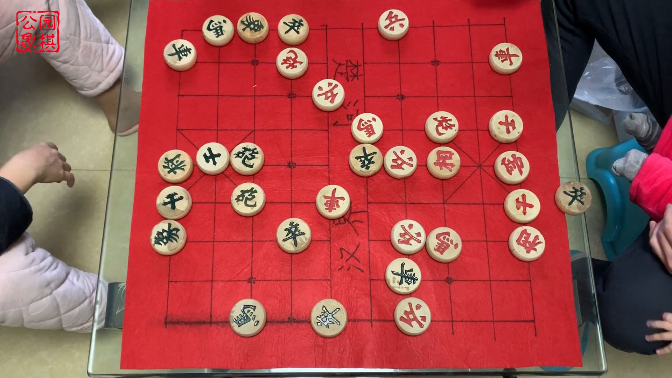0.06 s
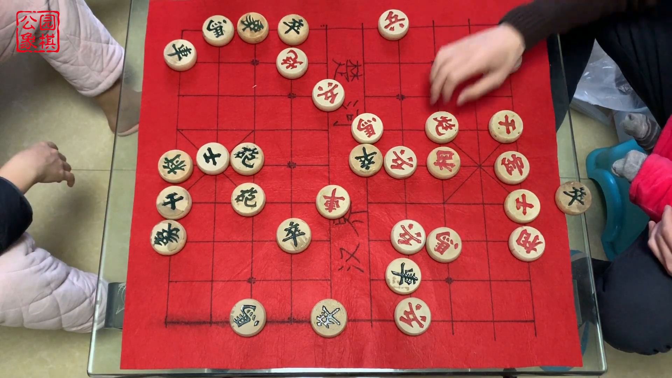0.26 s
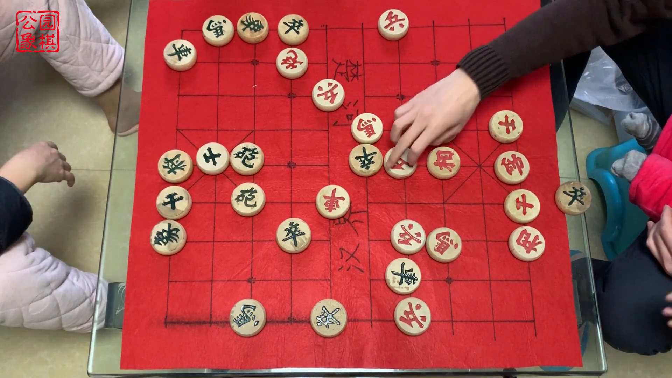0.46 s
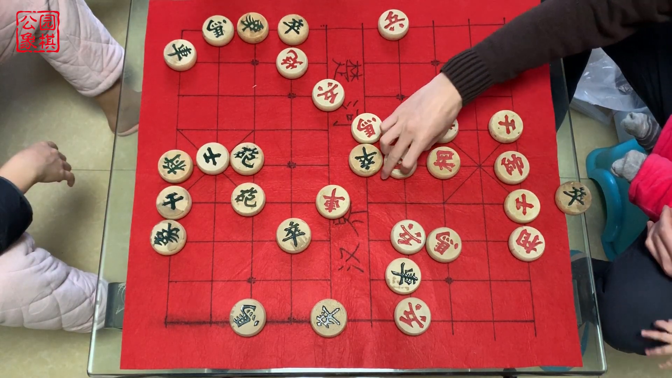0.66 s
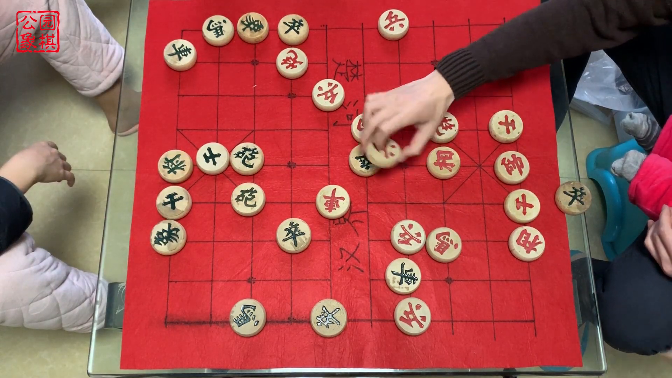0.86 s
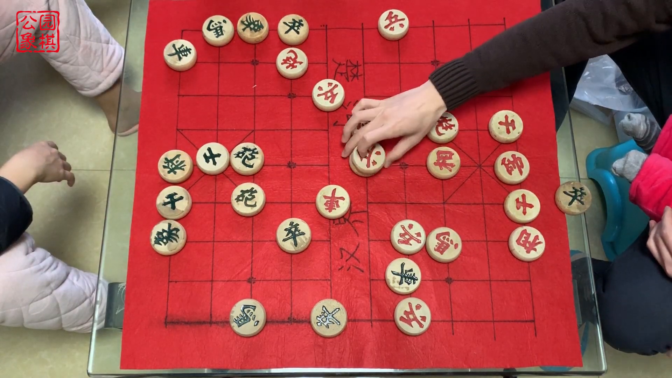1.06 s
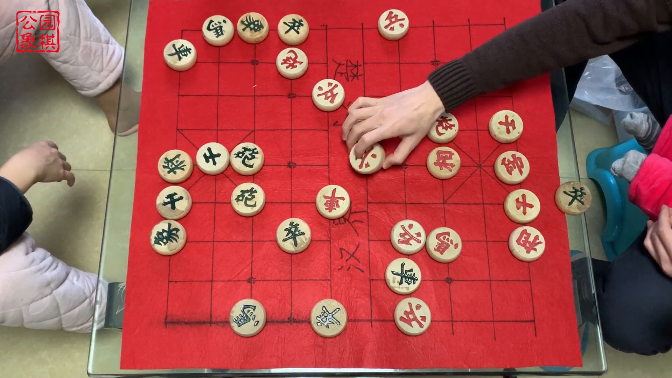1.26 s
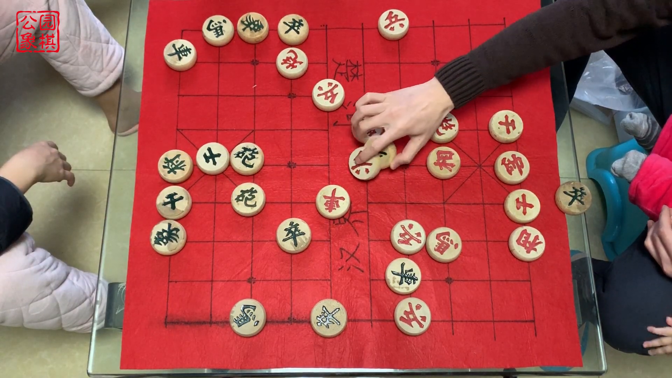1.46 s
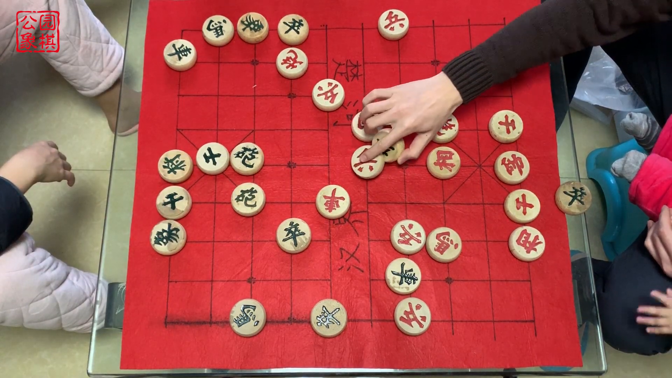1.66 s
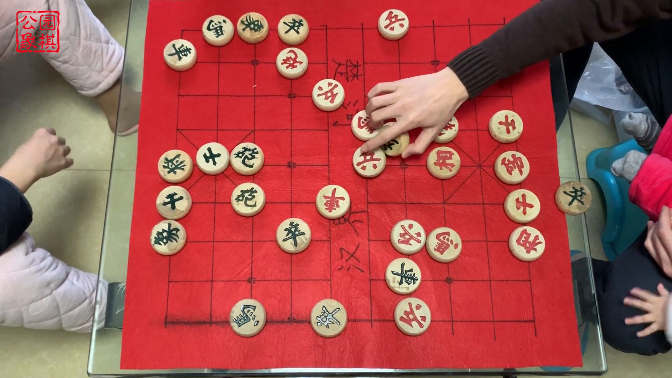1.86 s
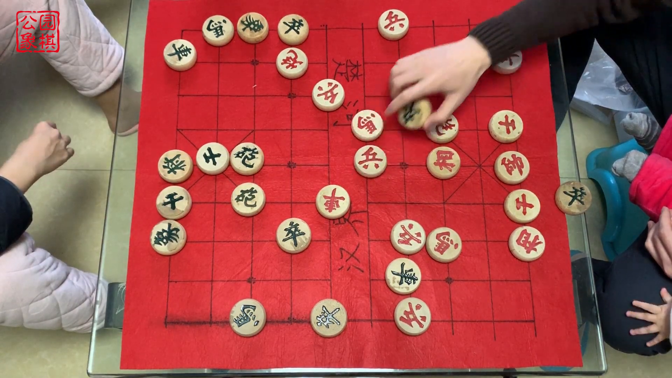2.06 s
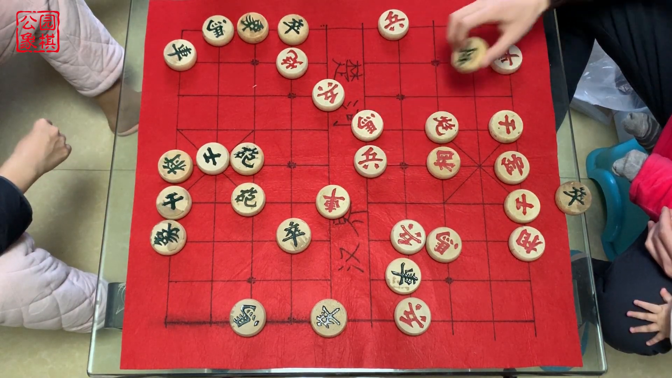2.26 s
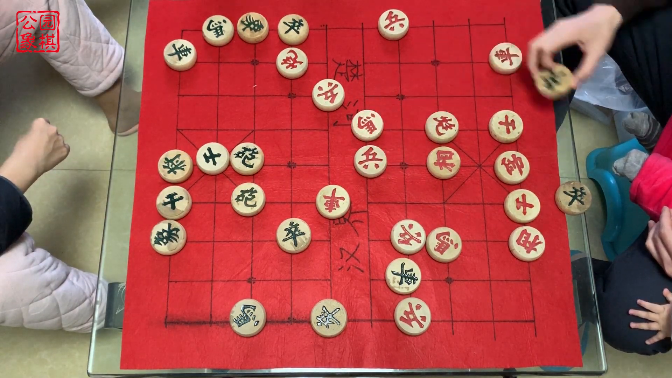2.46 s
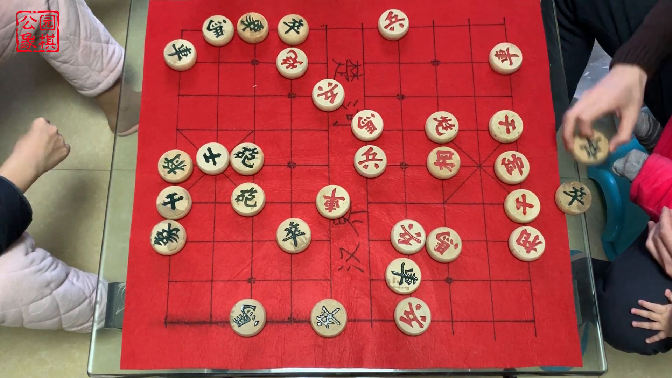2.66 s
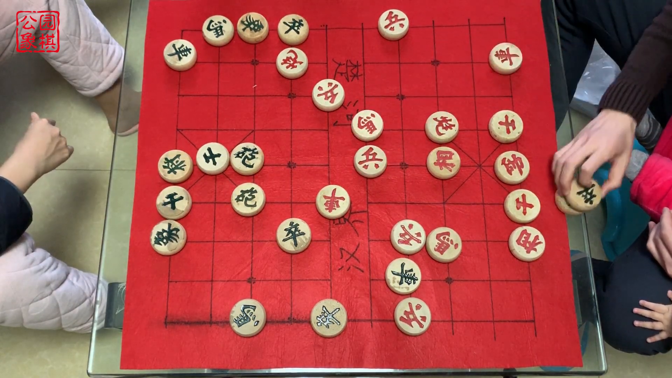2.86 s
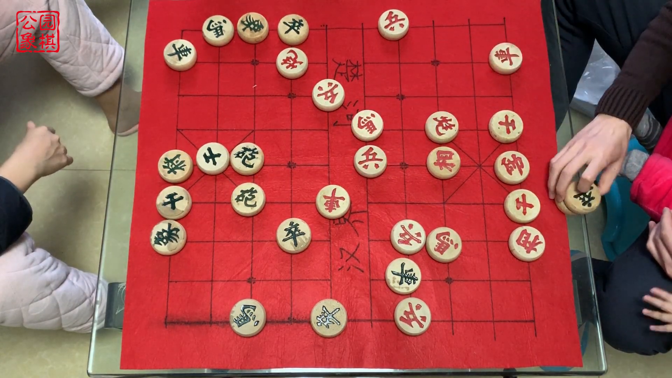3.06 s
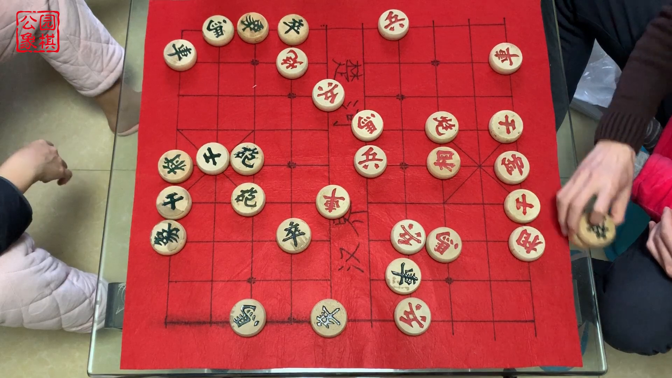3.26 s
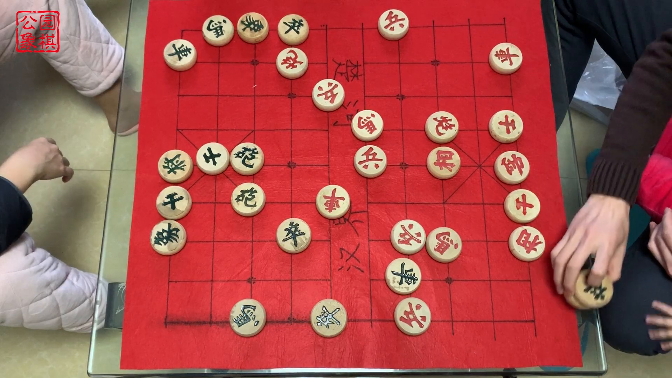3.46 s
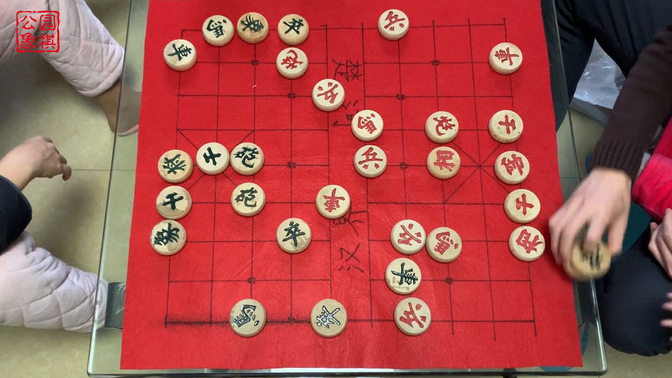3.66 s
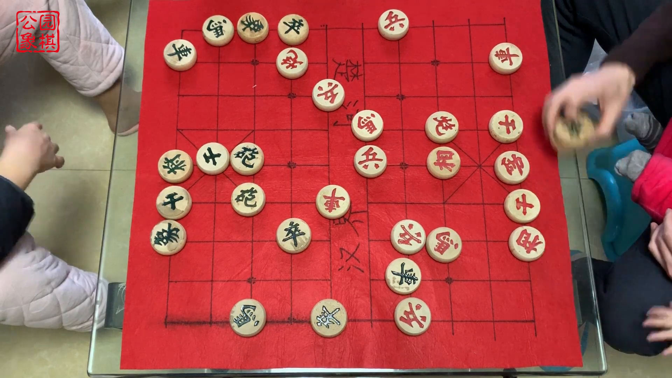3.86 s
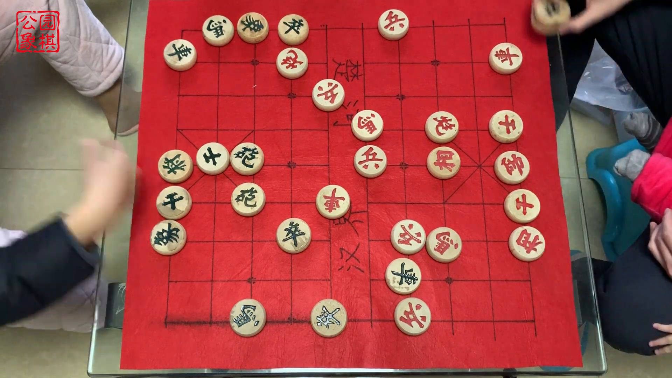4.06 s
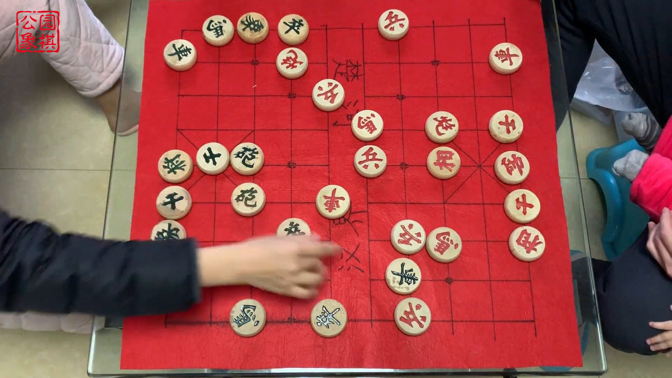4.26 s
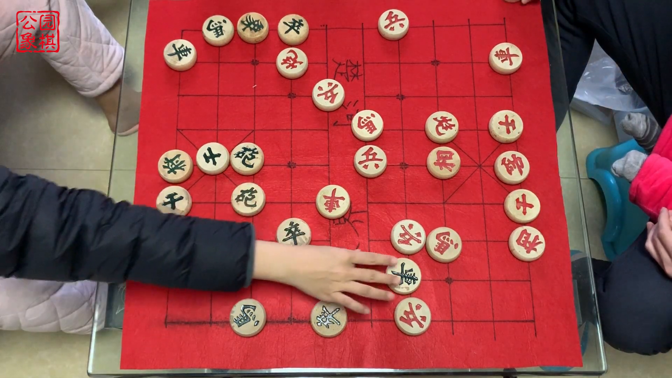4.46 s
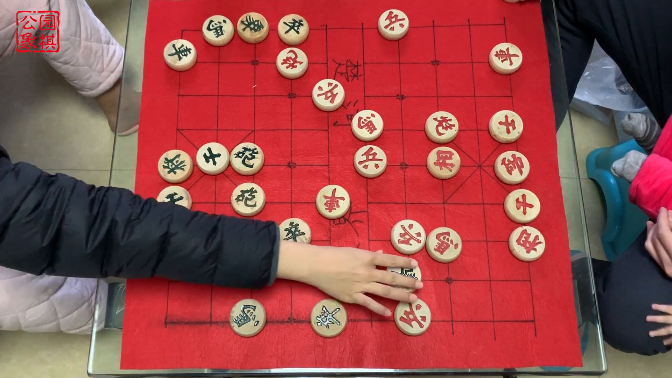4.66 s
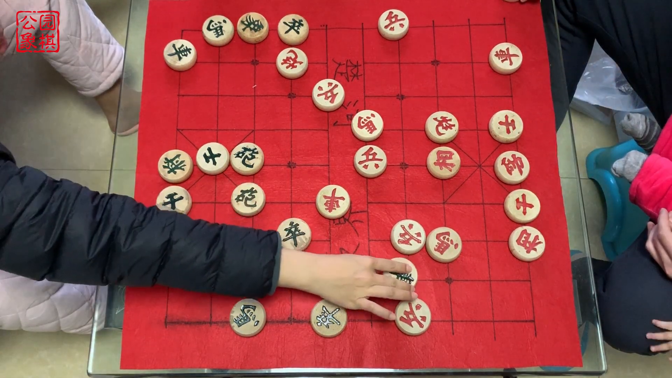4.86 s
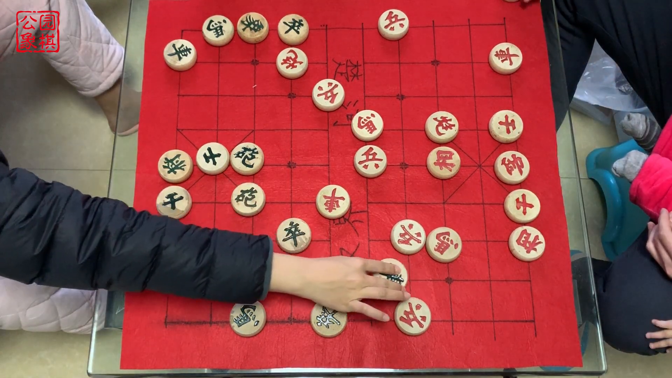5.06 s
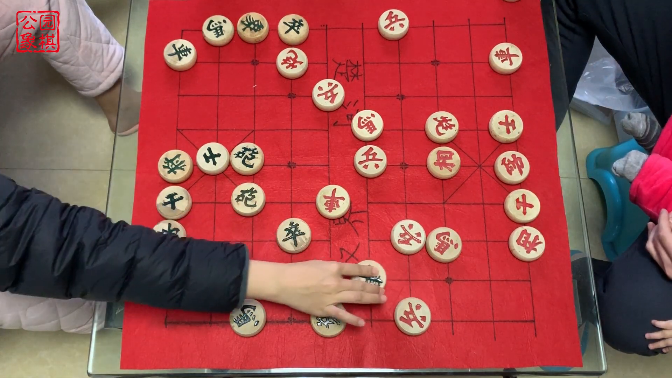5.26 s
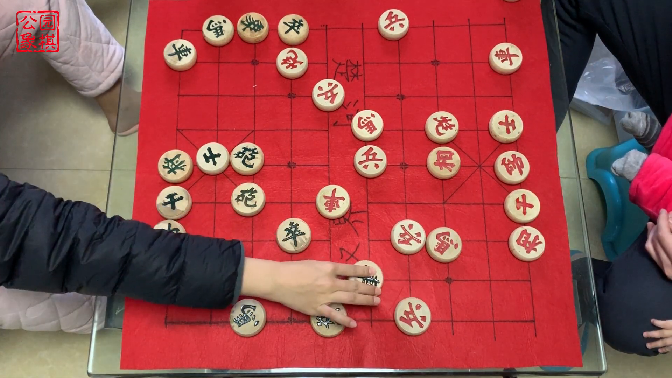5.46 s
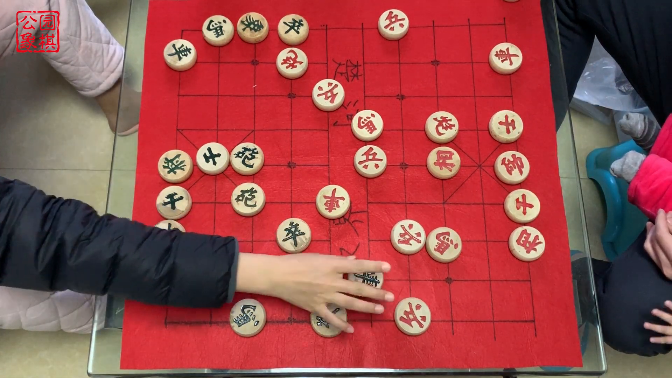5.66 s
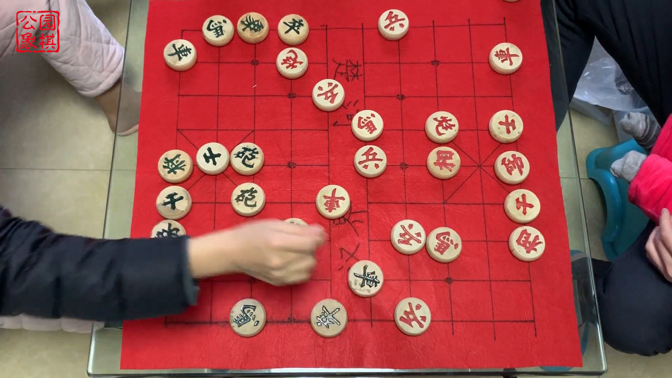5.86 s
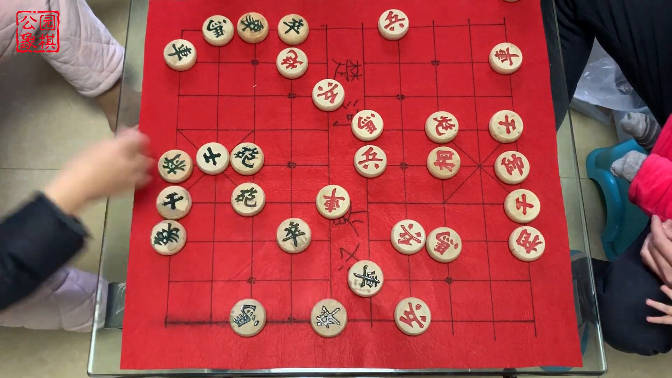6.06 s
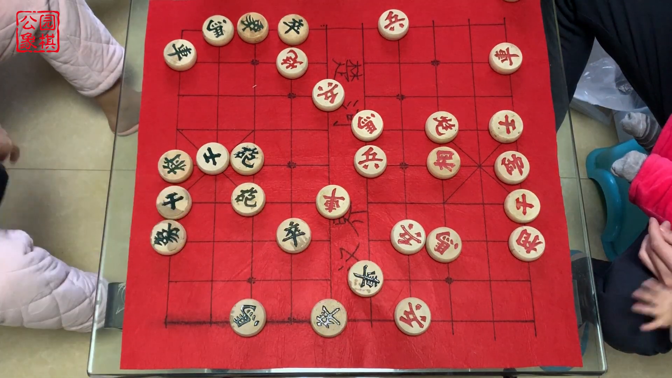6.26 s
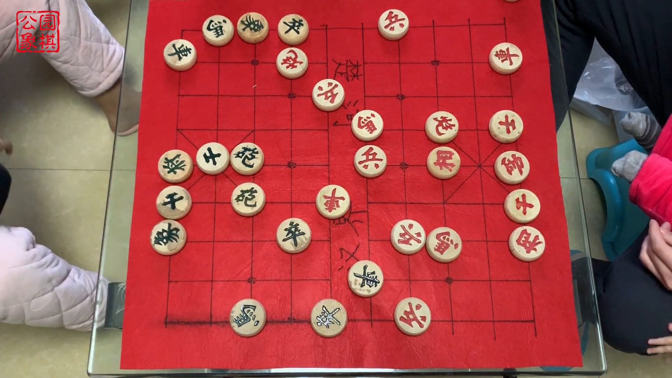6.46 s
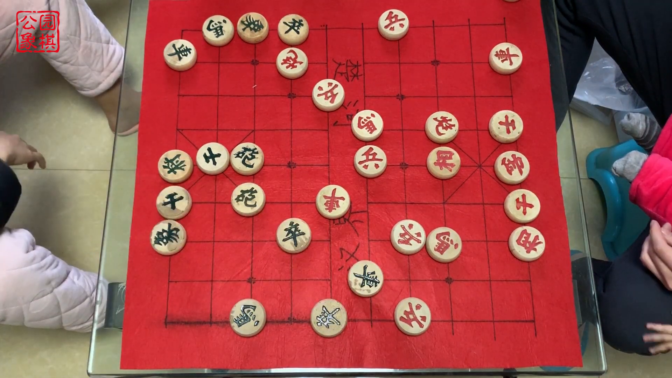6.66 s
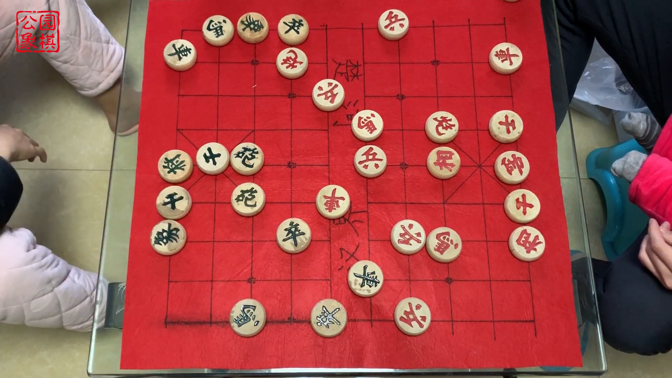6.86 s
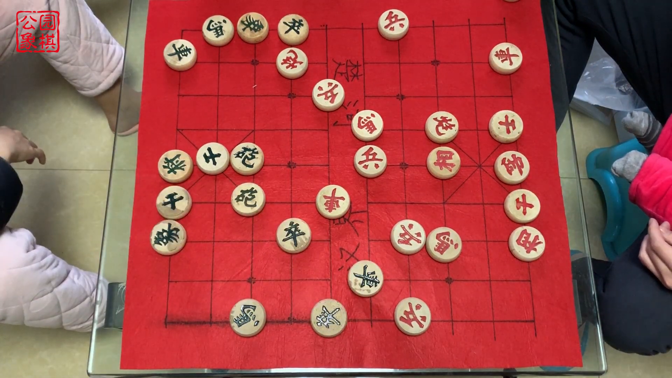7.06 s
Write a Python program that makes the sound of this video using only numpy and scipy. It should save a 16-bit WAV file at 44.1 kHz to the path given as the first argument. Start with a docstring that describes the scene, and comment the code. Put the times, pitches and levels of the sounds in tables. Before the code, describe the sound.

A wooden disc slaps loudly onto another on a felt-covered glass table, then a double clack on the rim and a sharp reply, over faint hum.

```python
"""A steady hum and the rustle of sleeves are heard first, then wooden chess pieces on a felt board over glass.
One piece is slapped onto another, the captured one is dropped on the bare glass rim, and a reply is slapped down.
A car horn toots once, far away; the listener is just above the table, between hard walls.
Hum and cloth are shaped noise, the horn is a sum of harmonics, and the table rings as a bank of decaying modes
with dense clatter; each wooden contact is a band-limited pulse with a few short modes of the piece."""
import sys
import numpy as np
from scipy import signal
from scipy.fft import rfft, irfft, next_fast_len
from scipy.io import wavfile
from scipy.ndimage import map_coordinates

SR = 44100
rng = np.random.default_rng(int(sys.argv[2]) if len(sys.argv) > 2 else 0)


def to_wav(sig):
    """Store sig (one row per channel, or 1-D mono) as 16-bit WAV at the path in sys.argv[1].

    Samples outside -1..1 are clipped; the rate is SR.
    """
    pcm = np.clip(np.atleast_2d(sig), -1, 1) * 32767
    pcm = np.round(pcm).astype(np.int16)
    wavfile.write(sys.argv[1], SR, pcm.T)  # frames by channels


N = 313754  # length of the scene in samples
T = np.arange(int(.7 * SR)) / SR  # time axis of one short event, s


def amp(db):
    """Level: decibels to amplitude gain."""
    return 10 ** (np.asarray(db) / 20)


def unit(x):
    """Normalisation: scale to rms 1."""
    return x / np.sqrt(np.mean(x ** 2) + 1e-20)


def along(points, hz):
    """Logarithmic pitch scale: read (Hz, value) points at any frequency."""
    f, value = np.transpose(points)
    return np.interp(np.log(hz + 1), np.log(f), value)


def wobble(rate):
    """Slow modulation: a smooth random curve with rate knots a second."""
    knots = rng.standard_normal(int(N * rate / SR) + 4)
    return map_coordinates(knots, [np.arange(N) * rate / SR])


def swell(rows, rest_db):
    """Power addition: bell-shaped swells (s, length s, dB) add in power to a resting gain."""
    t = np.arange(N) / SR
    power = amp(rest_db) ** 2
    for s, length, db in rows:
        bell = np.exp(-2 * ((t - s) / length) ** 2)
        power = power + (amp(db) * bell) ** 2
    return np.sqrt(power)


def filtered(x, response):
    """Linear filtering: multiply the spectrum by a response of frequency."""
    n = x.shape[-1]
    m = next_fast_len(n + 8192)
    return irfft(rfft(x, m) * response(np.fft.rfftfreq(m, 1 / SR)), m)[..., :n]


def band(x, low_hz, high_hz):
    """Band limiting: a causal third-order band-pass."""
    return signal.sosfilt(signal.butter(3, [low_hz, high_hz], "band", fs=SR, output="sos"), x)


def noise(size, spectrum, alike):
    """Interaural correlation: stereo noise with a given colour and left-right likeness."""
    def colours(hz):
        turn = np.arccos(np.clip(along(alike, hz), -1, 1)) / 2
        return amp(along(spectrum, hz)) * [np.cos(turn), np.sin(turn)]

    mid, side = filtered(rng.standard_normal((2, size)), colours)
    return np.array([mid + side, mid - side])


def dying(x, t60):
    """Frequency-dependent damping: each band decays by 60 dB in its own t60."""
    hz, t, z = signal.stft(x, SR, nperseg=256)
    decay = amp(-60 * t / along(t60, hz)[:, None])
    return signal.istft(z * decay, SR, nperseg=256)[1][:, :x.shape[1]]


def panned(x, left_right_db):
    """Level difference: share a left-right difference in dB between the two channels."""
    return x * amp([[left_right_db / 2], [-left_right_db / 2]])


def add(out, s, sound):
    """Superposition: mix a sound in at time s."""
    part = out[:, round(s * SR):][:, :sound.shape[1]]
    part += sound[:, :part.shape[1]]


# colour of the steady wash. Each row: frequency in Hz, relative level in dB per Hz
HUM_SPECTRUM = [(15, -15), (25, -8.5), (53, -3), (100, -10.5), (160, -9.5), (400, -14), (650, -14.5),
                (1000, -11), (1500, -21.5), (2400, -34.5), (5000, -48), (8000, -42.5), (12000, -44),
                (15500, -46)]
# stereo width of the wash and whir. Each row: frequency in Hz, left-right likeness (1 is identical)
HUM_ALIKE = [(60, 0.16), (180, 1), (550, 0.54), (1650, -0.038), (4970, -0.078), (15000, 0.5)]


def hum(level_db=-63.5):
    """Broadband noise: a steady coloured wash whose level drifts slightly."""
    return amp(level_db + 0.2 * wobble(3.6)) * unit(noise(N, HUM_SPECTRUM, HUM_ALIKE))


def whir(level_db=-70, centre_hz=990, width_hz=90):
    """Narrow-band noise: a fuzzy tone that fluctuates in level."""
    flat = noise(N, [(1000, 0)], HUM_ALIKE)
    tone = unit(band(flat, centre_hz - width_hz / 2, centre_hz + width_hz / 2))
    return amp(level_db + 2.6 * wobble(18)) * tone


# swells of the low rumble. Each row: time of the top in seconds, length in seconds, level in dB
RUMBLE_SWELLS = [(.54, 0.3, -58), (6.3, .9, -64.5)]


def rumble(rest_db=-71):
    """Low-frequency noise: a rumble alike in both channels swells above its resting level."""
    spectrum = [(12, -15), (27, 0), (60, -6), (150, -25), (600, -67.5), (2000, -120)]  # Hz, dB per Hz
    return swell(RUMBLE_SWELLS, rest_db) * unit(noise(N, spectrum, [(50, 1.0)]))


def horn(start_s=3.765, end_s=3.9, level_db=-63, low_hz=399, high_hz=491, flare_hz=1040, flare_width_hz=330):
    """Resonance: harmonics of two steady notes pass the flare's peak and are dulled by distance."""
    tone = 0
    for hz in np.outer([low_hz, high_hz], np.arange(1, 5)).ravel():
        flare = 1 / np.hypot(1, 2 * (hz - flare_hz) / flare_width_hz)
        tone = tone + flare * np.sin(2 * np.pi * hz * T)
    tone = unit(band(tone, 250, 1470))
    fade_in = np.clip(T / 0.024, 0, 1)
    fade_out = np.clip((end_s - start_s - T) / 0.021, 0, 1)
    out = np.zeros((2, N))
    add(out, start_s, amp(level_db) * fade_in * fade_out * np.array([tone, tone]))
    return out


# arm movements that brush a sleeve. Each row: fastest moment in seconds, length in seconds,
# level of the rub in dB, brightness (hiss against rub) in dB
STROKES = [(0.219, 0.074, -66.5, -9), (0.286, 0.045, -70.5, -4.5), (0.514, 0.047, -74.5, 5.5),
           (1.04, .06, -78.5, 9.5), (1.6, .16, -79, 0), (2.76, 0.35, -82, 3), (4.1, 0.19, -78, 1.5),
           (4.354, .014, -66.5, -2), (4.402, 0.059, -70, -2), (4.509, 0.25, -64.5, -3), (5.334, .3, -83, 7),
           (6.12, 0.32, -74, -2), (6.487, 0.03, -66, -10), (6.56, 0.41, -70, -4), (6.728, 0.15, -67, 6)]
# colour of rubbing cloth. Each row: frequency in Hz, relative level in dB per Hz
RUB_SPECTRUM = [(600, -23), (1600, 4), (2800, 1.5), (5000, -6), (9000, -21.5)]
# colour of smooth fabric's hiss. Each row: frequency in Hz, relative level in dB per Hz
HISS_SPECTRUM = [(2000, -25.5), (5500, -5.5), (8500, 0.5), (11500, -3), (13600, -6.5), (15500, -1.5)]


def sleeves(grain_db=0.8, rest_db=-87, rest_bright_db=-2):
    """Friction noise: cloth brushes in small uneven catches as an arm speeds up and slows; smooth fabric hisses."""
    grain = amp(grain_db * wobble(130) + wobble(20))
    rub = unit(noise(N, RUB_SPECTRUM, [(1500, 0.16), (8000, .1)]) * grain)
    hiss = unit(noise(N, HISS_SPECTRUM, [(8000, 0.12)]) * amp(1.3 * wobble(140)))
    # the resting levels are a faint constant hiss underneath
    rub_gain = swell([(s, length, db) for s, length, db, _ in STROKES], rest_db)
    hiss_rows = [(s, length, db + bright_db) for s, length, db, bright_db in STROKES]
    hiss_gain = swell(hiss_rows, rest_db + rest_bright_db)
    return rub_gain * rub + hiss_gain * hiss


# colour of the room's answer. Each row: frequency in Hz, relative level in dB
ROOM_SPECTRUM = [(60, -3.5), (150, 2.5), (500, -0.5), (2000, -2), (4000, -1), (6200, -2), (9000, -7),
                 (12000, -3), (15000, -20.5)]
# reverberation time. Each row: frequency in Hz, t60 in seconds
ROOM_T60 = [(100, .42), (500, 0.47), (2400, 0.5), (6000, .35), (8000, 0.31), (14000, 0.19)]
# stereo width of the room and the clatter. Each row: frequency in Hz, left-right likeness (1 is identical)
ROOM_ALIKE = [(150, 1), (400, .88), (900, 0.8), (2000, .35), (5000, 0.12), (12000, 0.17)]


def in_room(x, wet_db, walls_s=0.0086, near_db=-7):
    """Reverberation: weak echoes from table and players come first, then the walls answer."""
    near = amp(near_db) * np.minimum(T / walls_s * 2, 1)
    build = np.where(T < walls_s, near, 1)
    tail = dying(noise(len(T), ROOM_SPECTRUM, ROOM_ALIKE), ROOM_T60) * build
    tail /= np.linalg.norm(build * amp(-60 * T / ROOM_T60[2][1]))
    return x + amp(wet_db) * signal.fftconvolve(x, tail, axes=1)[:, :len(T)]


# the struck places on the table, in the order of the level columns below
SPOTS = ["middle", "rim", "near"]
# modes of the glass top. Each row: frequency in Hz, t60 in seconds, then relative level in dB
# when struck in the middle, on the rim and on the near side
GLASS_MODES = [(137, .23, 4.5, -5, -7), (179, 0.18, 1.5, -1.5, -1), (224, .3, -6, -11, 3),
               (246, .28, -.5, -25, 1), (332.2, 0.27, -3, 5.5, 2), (380, 0.22, -11.5, -8, 2),
               (471, 0.26, 0, -16, -8), (624, 0.22, 5.5, 5, -6), (717, .2, -4, -14, -6),
               (883, 0.32, -0.5, -15, -15), (940, .3, -5.5, 1, 0), (956, 0.25, -7.5, 3, 4.5),
               (1007, 0.24, -8, 5, -4), (1051, 0.36, 0, 10, -11.5), (1205, .22, -4, -7.5, 5),
               (1393.7, .35, -10.5, -2, -11.5), (1619, 0.29, -1.5, -2, 3), (1713, .3, -2, 3, -10.5),
               (1930, .3, -0.5, -18, -24), (2347, .22, -7, -1.5, -13.5), (2419, .3, -6, 5, .5),
               (2592, .4, -0.5, -13, -5.5), (2840, .27, -8, 0.5, -2), (3194, .28, -0.5, -13, 1.5),
               (3631, 0.17, -8.5, 9.5, -13), (3950, .2, -11.5, -5, 8), (4086, .2, -4.5, 10.5, -1),
               (4707, 0.25, -13.5, 8, -13), (5650, .22, -13.5, -6, 4), (6043, .33, 1.5, -17, 2)]


def glass_ringing(modes_db=-19.5, port_lag_s=.0001, wander=.016):
    """Modal synthesis: the plate rings as decaying sines, in proportions set by the struck spot."""
    hz, t60, *spot_db = np.transpose(GLASS_MODES)[:, :, None]
    # a mode's phase belongs to the spot
    phase = rng.uniform(0, 2 * np.pi, (len(SPOTS), len(GLASS_MODES), 1))
    # the plate is wide, so each mode reaches the two microphone ports with its own lag
    lag = port_lag_s * rng.standard_normal(hz.shape) * np.array([-.5, .5])[:, None, None]
    # loose pieces lying on the glass blur the modes, the higher ones most: their phases wander
    steps = rng.standard_normal((len(GLASS_MODES), len(T)))
    blur = wander * np.sqrt(hz / hz.mean()) * np.cumsum(steps, axis=1)
    ringing = {}
    for spot, db, start in zip(SPOTS, spot_db, phase):
        decay = amp(modes_db + db - 60 * T / t60)
        ringing[spot] = (decay * np.sin(2 * np.pi * hz * (T + lag) + start + blur)).sum(axis=1)
    return ringing


# blows on the table. Each row: start in seconds, level in dB (rms of the first 20 ms before room and panning),
# treble edge in Hz (lower for softer contact), spot
KNOCKS = [(0.2066, -61, 4900, "rim"), (0.702, -56, 258, "middle"), (1.1246, -32.5, 4200, "middle"),
          (1.127, -27.5, 2600, "middle"), (1.629, -53.5, 270, "middle"), (1.8125, -68.5, 2900, "rim"),
          (2.062, -62, 4500, "middle"), (2.081, -48, 850, "middle"), (2.09, -42.5, 320, "middle"),
          (3.0398, -31.5, 7200, "rim"), (3.054, -30, 4600, "rim"), (3.085, -28, 4146, "rim"),
          (3.5563, -68.5, 4500, "rim"), (4.085, -62, 3000, "rim"), (4.615, -28, 7973, "near"),
          (4.627, -27, 6330, "near"), (6.225, -66.5, 8000, "rim")]
# colour of the glass top's dense, quickly damped modes. Each row: frequency in Hz, relative level in dB per Hz
CLATTER_SPECTRUM = [(60, -4.5), (140, -2.5), (400, -2), (1000, 0.5), (2400, 1), (4200, -4), (6000, -10.5),
                    (9000, -2), (15000, -19)]
# damping of those modes. Each row: frequency in Hz, t60 in seconds
CLATTER_T60 = [(100, 0.081), (1000, 0.076), (4000, .1), (12000, 0.31)]
# level of the thud against the blow; the frame holds the rim still. Each entry: spot, level in dB
THUD_DB = {"middle": -6.5, "rim": -24, "near": -16}


def knocks(wet_db=-2, pan_db=0.5, attack_s=0.0014, thud_s=.013, thud_low_hz=72, thud_high_hz=230,
           slap_db=-28, slap_octaves=3.8, octaves_per_db=-0.03):
    """Impact excitation: a blow rings the glass; felt and fingers take off the treble; a low thud follows."""
    out = np.zeros((2, N))
    ringing = glass_ringing()
    rise = 1 - np.exp(-T / attack_s)
    for s, level_db, high_hz, spot in KNOCKS:
        ring = ringing[spot] * rise
        clatter = dying(unit(noise(len(T), CLATTER_SPECTRUM, ROOM_ALIKE)), CLATTER_T60) * rise
        heard = panned(ring + in_room(clatter, wet_db), pan_db)
        # the band of a blow at slap_db is slap_octaves wide; that of a lighter blow is wider
        octaves = slap_octaves + octaves_per_db * (level_db - slap_db)
        blow = s, level_db, high_hz / 2 ** octaves, high_hz
        # the whole top gives under the hand just after the blow
        thud = s + thud_s, level_db + THUD_DB[spot], thud_low_hz, thud_high_hz
        for start_s, db, low_edge_hz, high_edge_hz in blow, thud:
            first = band((ring + clatter)[:, :SR // 50], low_edge_hz, high_edge_hz)
            first_rms = np.sqrt(np.mean(first ** 2))
            add(out, start_s, amp(db) / first_rms * band(heard, low_edge_hz, high_edge_hz))
    return out


# wood snapping on wood. Each row: start in seconds, pulse peak in dB before room and panning,
# pulse centre in Hz (higher for harder contact), piece, left-right difference in dB (positive is left)
CLICKS = [(1.1243, -8, 2150, "captured", 4.5), (1.1259, -10.5, 2150, "captured", -1.5),
          (1.1304, -7.5, 9000, "captured", 0.5), (1.1311, 0, 7030, "captured", -2.5),
          (1.132, -15, 1900, "captured", 1), (1.583, -46.5, 970, "captured", 6),
          (1.812, -43, 1508, "captured", 4), (2.058, -49.5, 2200, "captured", -2),
          (3.042, -17.5, 8010, "captured", -2), (3.0842, -26, 3000, "captured", 3),
          (4.0761, -54, 1890, "captured", 5), (4.6141, -15, 4200, "reply", -5.5),
          (4.6277, -16.5, 7990, "reply", -3), (6.473, -49, 1900, "reply", 6)]
# the two pieces that are hit hard. Each entry: piece, base frequency in Hz, ring against the click in dB
PIECES = {"captured": (6080, -6), "reply": (5600, 0)}
# modes of one wooden piece. Each row: multiple of the base frequency, relative level in dB, t60 in seconds
PIECE_MODES = [(0.998, -2.5, 0.018), (1.05, -6.5, 0.016), (1.25, -8.5, .005), (1.63, -8, 0.019),
               (1.7, -3.5, .014), (1.96, -8, .016)]


def clicks(spread=1.9, wet_db=-1, port_phase=1.1, attack_s=0.00035, reach=1.5):
    """Contact time: each hard contact sends out one short pulse and rings the small disc for a few cycles."""
    out = np.zeros((2, N))
    impulse = 1. * (T == 0)
    # the disc's high modes reach the two ports out of step (port_phase in radians)
    lead = np.array([[-.5], [.5]]) * port_phase
    for s, click_db, click_hz, piece, pan_db in CLICKS:
        # the contact time limits the treble steeply, the disc's small size the bass
        edges = click_hz / spread, click_hz * spread
        pulse = band(band(impulse, *edges), *edges)
        pulse = pulse / np.abs(pulse).max()
        base_hz, ring_db = PIECES[piece]
        ring = 0
        for k, db, t60 in PIECE_MODES:
            ring = ring + amp(db - 60 * T / t60) * np.sin(2 * np.pi * base_hz * k * T + lead * k)
        ring = ring * (1 - np.exp(-T / attack_s))
        # only a hard contact reaches up to those modes
        excited = amp(ring_db) / np.hypot(1, (base_hz / (reach * click_hz)) ** 3)
        direct = amp(click_db) * (pulse + excited * ring)
        add(out, s, in_room(panned(direct, pan_db), wet_db))
    return out


def scene():
    """Superposition: surroundings, players, table and pieces add up."""
    surroundings = hum() + whir() + rumble() + horn()
    return surroundings + sleeves() + knocks() + clicks()


# response of the two microphone ports. Each row: frequency in Hz, gain of their sum in dB,
# gain of their difference in dB
MICROPHONE = [(8750, 0.5, 1), (9890, -18, 1.5), (10485, 0, -0.5), (12000, 3, -0.5), (12900, -13, -6.5),
              (15000, -0.5, -0.5)]


def record(dry, ceiling=.93, top_hz=15900):
    """Interference and saturation: the ports fall out of step in the top octave; peaks round off; a band limit."""
    mid_side = np.array([dry[0] + dry[1], dry[0] - dry[1]]) / 2
    f, *gains = np.transpose(MICROPHONE)
    mid, side = filtered(mid_side, lambda hz: amp([along(np.c_[f, db], hz) for db in gains]))
    x = np.array([mid + side, mid - side])
    x = x / (1 + (x / ceiling) ** 6) ** (1 / 6)
    return filtered(x, lambda hz: 1 / (1 + (hz / top_hz) ** 120))


dry = scene()
out = record(dry)
to_wav(out)
```